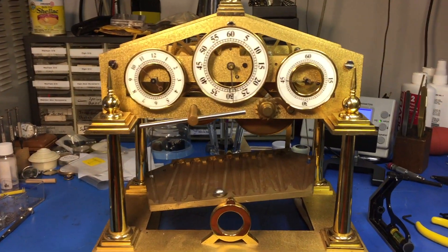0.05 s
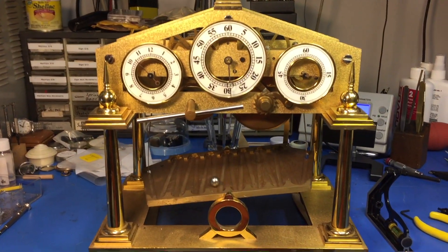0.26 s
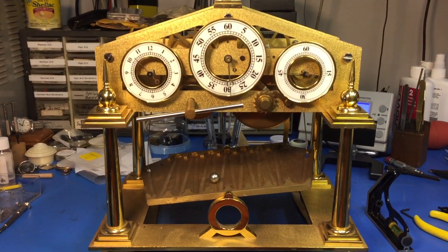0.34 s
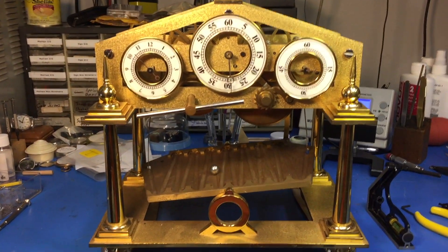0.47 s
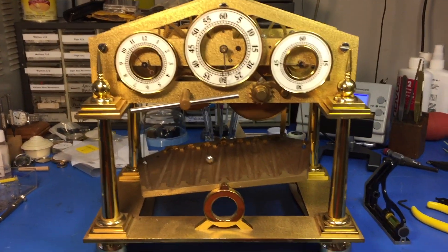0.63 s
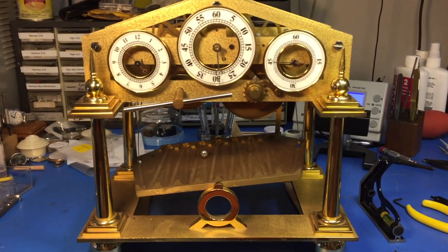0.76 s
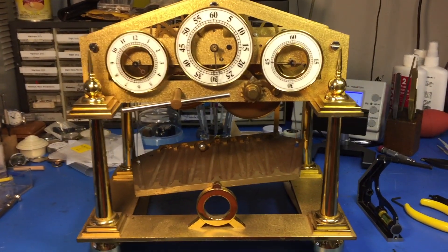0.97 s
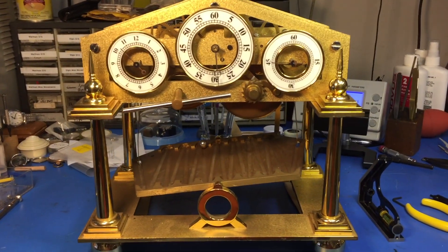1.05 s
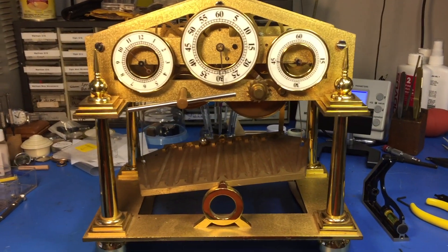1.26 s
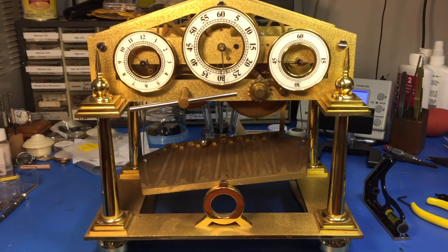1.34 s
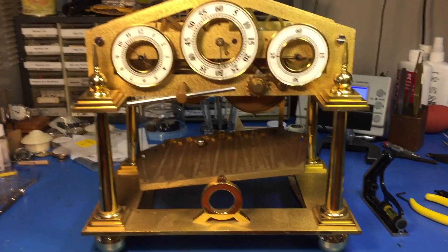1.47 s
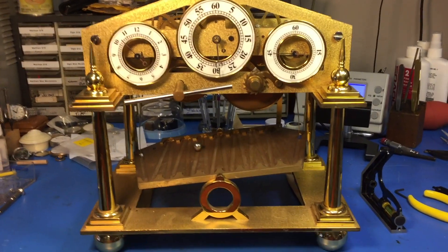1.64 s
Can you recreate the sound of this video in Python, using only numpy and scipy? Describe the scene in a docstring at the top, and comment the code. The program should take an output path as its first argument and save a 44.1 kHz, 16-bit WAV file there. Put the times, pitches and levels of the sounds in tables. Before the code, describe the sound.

A rolling ball clock gives a sharp cluster of metallic clicks and a brief ping. Its steel ball rolls on with a faint whirr and soft knocks, then the clicks return and build to a rattle, close by in a quiet workshop.

```python
"""A rolling ball clock on a bench in a quiet workshop, heard from close by.
First the ball and the steel levers click against the brass frame, which rings briefly, and a loose steel
part pings. Then the ball rolls along its zigzag track with a faint grainy whirr and knocks softly at the
bends, while dull thuds come through the bench. After one second the clicks return and build to a rattle,
and the whirr swells at the end. A short echo and the steady air of the room lie under it all."""
import sys
import numpy as np
from scipy import signal
from scipy.fft import rfft, irfft
from scipy.io import wavfile

SR = 44100
rng = np.random.default_rng(int(sys.argv[2]) if len(sys.argv) > 2 else 0)


def master_out(mix):
    """Clip the mix to full scale and print it as 16-bit PCM to the path in sys.argv[1]."""
    frames = np.transpose(np.atleast_2d(mix))
    ceiling = np.clip(frames, -1, 1)
    pcm = np.round(ceiling * 32767).astype(np.int16)
    wavfile.write(sys.argv[1], SR, pcm)


N = 74970
t = np.arange(N) / SR
freqs = np.fft.rfftfreq(2 * N, 1 / SR)
BASS_HZ, MIDDLE_HZ, TREBLE_HZ, FIZZ_HZ = 2270, 5700, 9700, 14000


def mechanism():
    """Each click is a crack, a clatter of small parts and the frame's ring; tight contact damps them."""
    # clicks of the ball and levers: (time [s], level [dB], bass [dB], treble [dB], fizz [dB],
    # fade time of the clatter [s], ring of the frame [dB], pitch of the struck part [Hz])
    clicks = [(0.049, -51, -3, -10.5, 0, 0.12, -13, 4500), (0.056, -54.5, -16, -10, 0, 0.099, 8, 6700),
              (0.0875, -54, 2.5, -2, 13, 0.089, 2.5, 4930), (0.102, -53.5, -31, -4, 4, 0.062, -6, 5300),
              (0.149, -57, 5, -3, -10, 0.13, 0, 5260), (0.1792, -53.5, 2.5, -6, 3, 0.18, 6, 3270),
              (0.183, -53, 1, 7, -3, 0.08, -5, 6900), (0.2021, -25.5, -3, 6, 15, 0.033, -8, 6640),
              (0.2121, -32, -2, 2, 7.5, 0.087, -7, 4850), (0.222, -42, 8.5, 5, -12, 0.17, -32, 6500),
              (1.025, -48.5, -2, 0, 2, 0.063, -3, 7800), (1.034, -52.5, 6.5, -5, -8, 0.0075, 1.5, 5300),
              (1.116, -53.5, -0.5, -8.5, -8, 0.082, 0.5, 5800), (1.2023, -41, -3, -4, 11, 0.038, 1, 4400),
              (1.2381, -45, 3, -10.5, 9, 0.043, -2.5, 5400), (1.252, -56, 4, -4, 8, 0.025, -2, 4520),
              (1.333, -39.5, 2.5, 4, 10, 0.076, -3.5, 7620), (1.3389, -51, -5, -5, -4, 0.082, 3, 2930),
              (1.482, -31.3, 2, 1.5, 10, 0.041, -5, 6600),
              (1.5164, -35.5, -0.5, -5.5, 8, 0.036, -2.5, 6000), (1.519, -47.5, -1, 0, 2, 0.14, -5, 5750),
              (1.5275, -41, 9.5, 2.5, -4, 0.029, -11, 7550), (1.603, -60.5, 7, -12, -25, 0.031, 5, 2520),
              (1.640, -52, -1.5, -9.5, -8, 0.054, 3, 4440),
              (1.6846, -63.5, 10.5, -34, -17, 0.059, -2, 3620)]
    # tone colour shared by all clicks: (frequency [Hz], level [dB])
    click_colour = [(100, 4), (500, -21.5), (800, -19), (1100, -22), (1600, -11.5), (2300, -13.5),
                    (2800, -2), (3500, -5), (4400, -0.5), (5400, -0.5), (6600, 3), (8000, 1.5),
                    (9700, -8.5), (10400, -13.5), (11300, -12), (13500, -25), (16000, -30)]
    # notes of the brass frame: (pitch [Hz])
    frame_hz = [905, 1075, 1335, 1730, 1890, 2200, 2345, 2378, 2470, 2830, 3334, 3490, 4118, 4425, 4662,
                4786, 5098, 5184, 5440, 5610, 6089, 6191, 6258, 6382, 6547, 6706, 7046, 7139, 7585, 7854,
                8177, 8431, 9300, 9480, 9770]
    # the same notes before a click shapes them: (level [dB], fade time [s])
    frame_notes = [(-49, 0.073), (-27, 0.15), (-27, 0.19), (-31, 0.33), (-17.5, .077), (-18, 0.087),
                   (-16, 0.091), (-9, .07), (-19.5, 0.13), (-18.5, 0.054), (-12.5, .1), (-15, .1),
                   (-27.5, 0.1), (-8.5, .071), (-2, 0.019), (-25, .037), (-14.5, .029), (-12, 0.1),
                   (-3, 0.04), (-22, .039), (-22, .035), (-21, 0.087), (-15, 0.2), (-11, 0.094),
                   (-24.5, .07), (-30, .1), (-11, 0.11), (-21.5, .15), (-24, 0.045), (-10.5, 0.095),
                   (-15.5, .07), (-12.5, .09), (-4.5, 0.044), (-11.5, .045), (-7, .05)]
    part_count, attack_s = 190, 0.00078
    ring_time = t[:N // 3]
    tones = np.array([undb(db) * np.exp(2j * np.pi * hz * ring_time)
                      for hz, (db, _) in zip(frame_hz, frame_notes)])
    losses = np.log(1000) / np.array(frame_notes)[:, 1:] * ring_time
    # the small parts have random pitches, spread from low to high
    places = (np.arange(part_count) + rng.random(part_count)) / part_count
    parts = np.zeros(len(freqs))
    parts[(places * len(freqs)).astype(int)] = rng.rayleigh(size=part_count)
    out = np.zeros(N)
    for start, db, bass_db, treble_db, fizz_db, t60, ring_db, hz in clicks:
        contact = tilt(bass_db, treble_db, fizz_db)
        colour = curve(click_colour) * curve(contact) * struck_part(hz)
        crack = undb(-5) * burst(colour, t60=0.03)
        clatter = unit(irfft(parts * colour * phases(len(freqs)))[:N])
        body = undb(1) * clatter * fade(t60)
        # each click wakes the frame's notes in a different mix
        mix = curve(contact, np.array(frame_hz)) * struck_part(hz, np.array(frame_hz))
        mix = mix * undb(3.5 * rng.standard_normal(len(frame_hz))) * phases(len(frame_hz))
        damping = (0.085 / t60) ** 0.3  # a shorter clatter also means a shorter ring
        frame_ring = (mix @ (tones * np.exp(-losses * damping))).imag
        body[:len(ring_time)] += undb(ring_db) * frame_ring
        rise = 1 - np.exp(-t / attack_s)
        add(out, start, undb(db) * (crack + body * rise))
    return signal.sosfilt(signal.butter(3, 670, "high", fs=SR, output="sos"), out)


def steel_part():
    """A loose steel part sings on after a blow, chattering; light touches wake mostly its low notes."""
    # blows that set it off: (time [s], level [dB], treble [dB])
    pings = [(0.047, -57.5, -8.5), (0.2124, -45, -1.5), (0.255, -54, -10), (0.336, -60.5, -20.5),
             (0.431, -65.5, -18)]
    # notes of the part: (pitch [Hz])
    steel_hz = [1735, 2378, 3325, 5181, 6243, 7135, 8440, 9652]
    # the same notes: (level [dB], fade time [s])
    steel_notes = [(-19.5, 0.33), (4, 0.15), (-19, 0.24), (-13, 0.19), (-5, .18), (-2.5, 0.19), (-4.5, .12),
                   (-9.5, 0.2)]
    out = np.zeros(N)
    for start, db, treble_db in pings:
        for hz, (note_db, t60) in zip(steel_hz, steel_notes):
            touch = curve([(steel_hz[1], 0), (MIDDLE_HZ, treble_db)], hz)
            chatter_db = 4 * flicker(per_second=83)
            add(out, start, touch * ring(hz, t60) * undb(db + note_db + chatter_db))
    return out


def knocks():
    """The ball meets a wall: a short rattle of the plate and a note that belongs to that spot."""
    # wall hits: (time [s], level [dB], brightness [dB], rattle fade time [s], pitch [Hz], note level [dB])
    hits = [(0.310, -57.5, 8, 0.13, 4300, -7), (0.339, -56.5, 2, .05, 4400, -1),
            (0.431, -65, 1, 0.026, 4360, 1.5), (0.437, -58, -2.5, 0.03, 4480, -10),
            (0.4765, -61, -2, 0.024, 3720, -12), (0.5655, -59.5, -8, 0.059, 3650, -4),
            (0.634, -61.5, -8, 0.048, 2290, 6), (0.656, -57, 3, 0.07, 4730, -11),
            (0.802, -54, 4.5, 0.055, 7050, -8), (0.818, -60, 3, 0.056, 3460, 0),
            (0.9005, -61.5, 2, 0.024, 3590, -1.5), (1.026, -59, -13, 0.05, 905, -1.5),
            (1.099, -56.5, -18, 0.09, 2460, -5), (1.333, -62.5, 6, .1, 1074, 3),
            (1.360, -56, 9, 0.033, 3090, -5), (1.471, -57.5, 5, 0.028, 2360, -10),
            (1.636, -55.5, -6, 0.12, 6040, -2)]
    # tone colour shared by all knocks: (frequency [Hz], level [dB])
    knock_colour = [(200, -23), (600, -3), (1000, -0.5), (2300, 2), (4500, -2), (6500, 3), (9000, -4.5),
                    (12000, -56), (16000, -40)]
    out = np.zeros(N)
    for start, db, bright_db, t60, hz, note_db in hits:
        contact = tilt(-bright_db / 2, bright_db, bright_db)
        colour = track_plate() * curve(knock_colour) * struck_part(hz) * curve(contact)
        note = undb(note_db) * ring(hz, t60=0.085)
        add(out, start, undb(db) * (burst(colour, t60) + note))
    return out


def rolling():
    """Tiny bumps under the ball sound through the track plate; along some grooves one note sings."""
    # loudness of the whirr: (time [s], level [dB])
    loudness = [(0, -67.5), (.14, -82.5), (.27, -70), (.33, -80.5), (.39, -76.5), (.49, -81.5), (.56, -69),
                (.60, -76), (.70, -77), (.78, -71), (.86, -76.5), (1.0, -71.5), (1.17, -74.5),
                (1.30, -83.5), (1.46, -73.5), (1.58, -67.5), (1.625, -71), (1.655, -67.5), (1.7, -62.5)]
    # tone colour of the whirr: (frequency [Hz], level [dB])
    roll_colour = [(200, -5.5), (550, 4.5), (1000, 2), (1600, 5.5), (2400, 1), (4000, 1), (6500, 1),
                   (9000, -3.5), (12000, -58), (16000, -45)]
    # stretches of groove that sing: (start [s], length [s], level [dB], pitch [Hz])
    grooves = [(0.449, 0.18, -76, 2090), (0.502, 0.091, -81, 3650), (0.638, 0.4, -79.5, 1030),
               (0.75, 0.43, -82, 1767), (0.9, 0.34, -80.5, 1020), (1.567, 0.2, -67.5, 2500)]
    bumps_per_s, spot_count = 2600, 12
    bumps = (rng.random(N) < bumps_per_s / SR) * rng.choice([-1, 1], N)
    bumps = bumps * undb(rng.standard_normal(N))  # sizes vary by about 1 dB
    spot_times, step = np.linspace(0, t[-1], spot_count, retstep=True)
    out = np.zeros(N)
    for spot_time in spot_times:  # the colour blends from one spot to the next
        nearness = np.sqrt(np.maximum(1 - abs(t - spot_time) / step, 0))
        out += nearness * shape(bumps, track_plate() * curve(roll_colour))
    level_db = np.interp(t, *np.array(loudness).T)
    out *= undb(level_db - 0.5 * flicker(per_second=13.2))
    for start, length, db, hz in grooves:
        swell = np.sin(np.pi * np.clip((t - start) / length, 0, 1))
        out += undb(db) * swell * shape(bumps, resonance(hz, 90) ** 2)
    return out


def track_plate():
    """Tone colour of the plate at one random spot: every spot favours other pitches."""
    # pitches that the plate boosts: (pitch [Hz], width [Hz], level [dB])
    peaks = [(903, 48, 9), (1069, 34, 11), (1359, 21, 13), (1829, 86, 7.5), (2180, 310, -8),
             (2396, 120, 17.5), (2440, 30, 8), (2714, 23, 15), (3360, 70, 13.5), (3614, 130, 12),
             (4370, 160, 7.5), (4950, 390, 7), (5470, 50, 5.5), (6230, 34, 10.5)]
    spot_db = 3 * rng.standard_normal(len(peaks))
    power = sum((undb(db + extra_db) * resonance(hz, width)) ** 2
                for (hz, width, db), extra_db in zip(peaks, spot_db))
    return np.sqrt(1 + power)


def bench():
    """Dull thuds come through the bench, each a low rumble that swells and fades."""
    # soft thuds: (time [s], level [dB], pitch [Hz])
    thuds = [(0.602, -71.5, 121), (0.981, -72, 90), (1.186, -76.5, 196), (1.499, -67.5, 190)]
    rise_s = 0.024
    swell = t / rise_s * np.exp(1 - t / rise_s)
    out = np.zeros(N)
    for start, db, hz in thuds:
        rumble = shape(rng.standard_normal(N), hump(hz, octaves=0.64))
        add(out, start, undb(db) * rumble * swell)
    return out


def workshop(x):
    """The room adds a short, soft echo and the steady sound of its air."""
    # tone colour of the air: (frequency [Hz], level [dB])
    air_colour = [(20, -40), (35, -9.5), (55, 1), (110, 1), (200, -4), (300, -9), (365, -2.5), (450, -17),
                  (1000, -10), (2500, -14), (6000, -25), (10000, -23), (14800, -27), (15800, -45)]
    echo_colour, delay_s = [(3000, -3.5), (8000, -7.5), (15000, -2.5)], 0.024
    tail = shape(rng.standard_normal(N), curve(echo_colour)) * fade(t60=0.37) * (t > delay_s)
    echo = signal.fftconvolve(x, tail / np.sqrt(np.sum(tail ** 2)))[:N]
    air = shape(rng.standard_normal(N), curve(air_colour))
    return x + undb(-19) * echo + undb(-73.5) * air


def tilt(bass_db, treble_db, fizz_db):
    """Colour of one contact as (frequency [Hz], level [dB]) points: harder ones are brighter."""
    return [(BASS_HZ, bass_db), (MIDDLE_HZ, 0), (TREBLE_HZ, treble_db), (FIZZ_HZ, fizz_db)]


def struck_part(hz, at=freqs):
    """The struck part boosts a narrow band around its own pitch by up to 6 dB."""
    return undb(6 * hump(hz, octaves=0.1, at=at))


def hump(hz, octaves, at=freqs):
    """A bell-shaped curve around one pitch, 1 at its centre."""
    return np.exp(-.5 * (np.log2((at + 1) / hz) / octaves) ** 2)


def resonance(hz, width):
    """How strongly a part answers near its own pitch, 1 at the centre."""
    return 1 / np.sqrt(1 + (2 * (freqs - hz) / width) ** 2)


def burst(gain, t60):
    """Coloured noise that starts at once and dies away."""
    # build a filter that makes no sound ahead of the hit (minimum phase)
    cepstrum = irfft(np.log(unit(gain)))
    cepstrum[1:N] *= 2
    cepstrum[N + 1:] = 0
    noise = rng.standard_normal(N) * fade(t60)
    return irfft(rfft(noise, 2 * N) * np.exp(rfft(cepstrum)))[:N]


def ring(hz, t60):
    """One pure note that dies away."""
    return np.sin(2 * np.pi * hz * t) * fade(t60)


def fade(t60):
    """A smooth fall of 60 dB over the fade time, t60 seconds."""
    return np.exp(-np.log(1000) * t / max(t60, .005))


def flicker(per_second):
    """A random wander, mostly between -1 and 1."""
    turns = np.arange(0, t[-1] + 1 / per_second, 1 / per_second)
    return np.interp(t, turns, rng.standard_normal(N)[:len(turns)])


def phases(count):
    """Random starting points for waves."""
    return np.exp(2j * np.pi * rng.random(count))


def curve(points, at=freqs):
    """Gains along a line through (frequency [Hz], level [dB]) points."""
    hz, db = np.array(points).T
    return undb(np.interp(np.log(at + 1), np.log(hz), db))


def shape(x, gain):
    """Colour a sound with a gain at each frequency, then set its strength to 1."""
    return unit(irfft(rfft(x, 2 * N) * gain)[:N])


def unit(x):
    """Scale to an average strength (rms) of 1."""
    return x / np.sqrt(np.mean(x ** 2))


def undb(db):
    """Turn decibels into a gain, a number to multiply by."""
    return 10 ** (np.asarray(db) / 20)


def add(out, start, sound):
    """Mix a sound in at its start time."""
    i = max(int(start * SR), 0)
    out[i:] += sound[:N - i]


def scene():
    """The clock on its bench in the room, in one channel."""
    return workshop(mechanism() + steel_part() + rolling() + knocks() + bench())[None]


def record(dry):
    """Cut away the very highest treble."""
    top_hz = 16300
    return signal.sosfilt(signal.ellip(8, .2, 70, top_hz, fs=SR, output="sos"), dry)


dry = scene()
out = record(dry)
master_out(out)
```